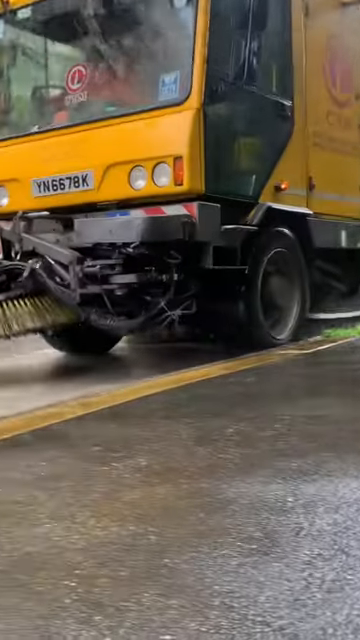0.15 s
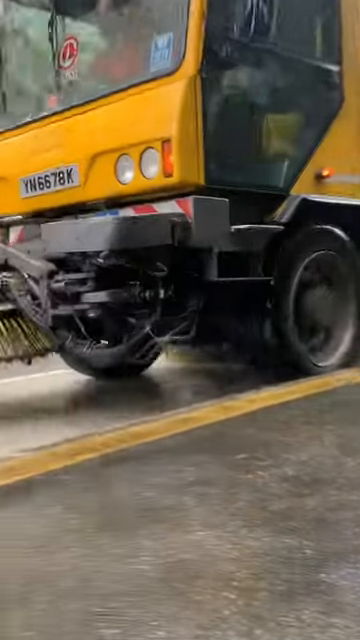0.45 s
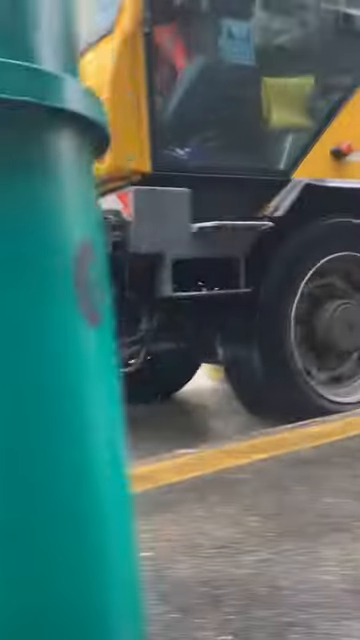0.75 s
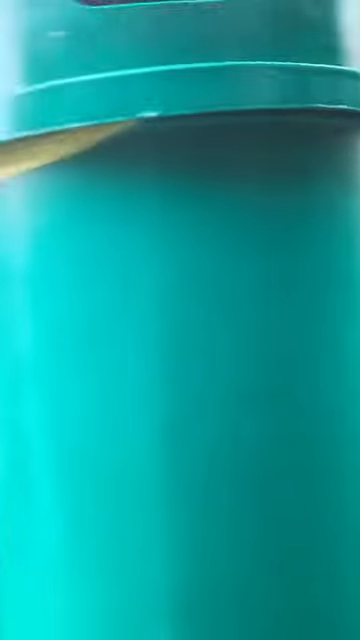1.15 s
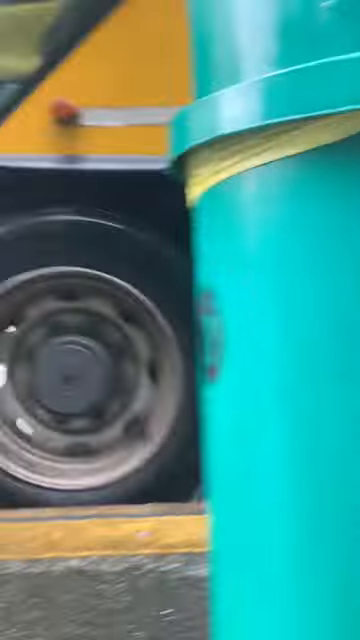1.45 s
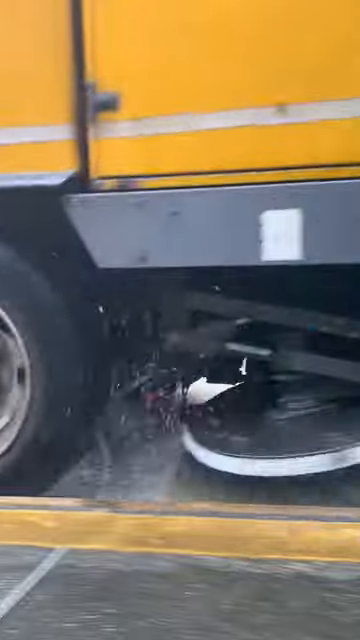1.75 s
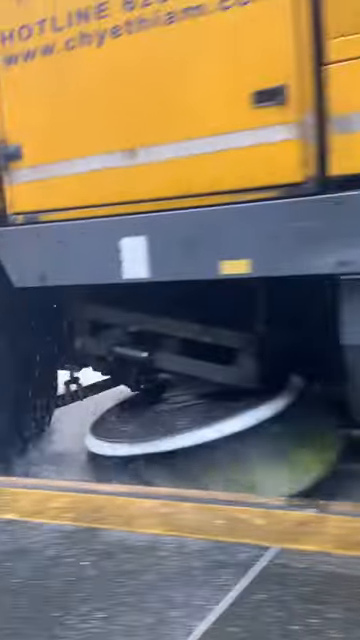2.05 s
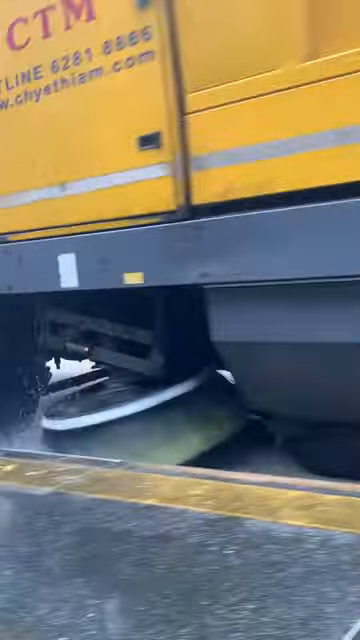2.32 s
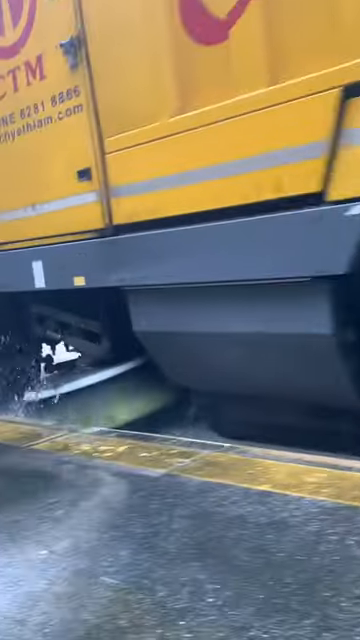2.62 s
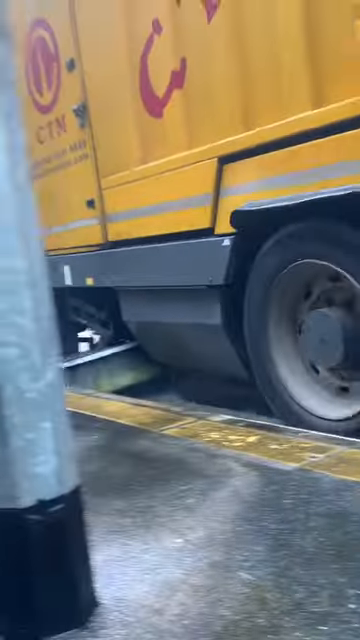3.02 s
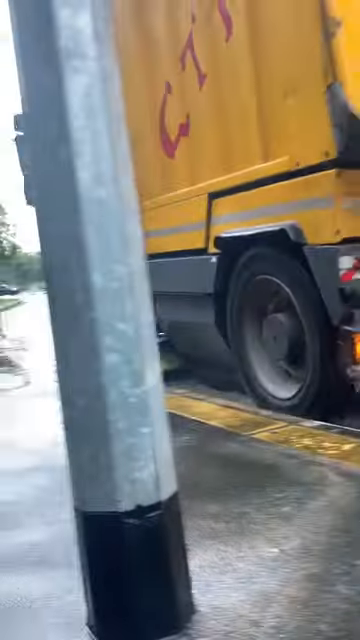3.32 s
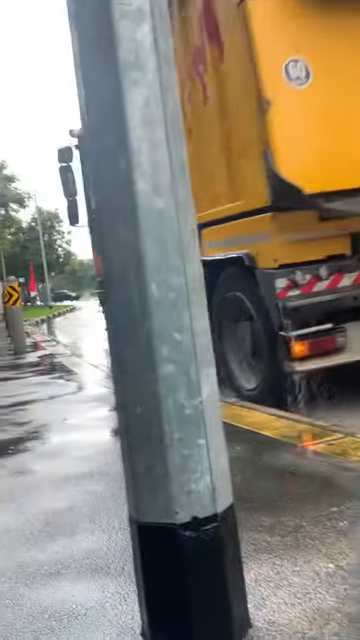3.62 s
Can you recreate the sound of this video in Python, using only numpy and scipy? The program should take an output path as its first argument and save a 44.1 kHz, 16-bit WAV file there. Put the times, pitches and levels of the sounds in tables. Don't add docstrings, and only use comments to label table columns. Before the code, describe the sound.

Close outdoor stereo pickup of a street sweeper: loud hiss of brushes and water jets over rushing suction and a constant engine drone; the hiss dips midway, returns, then dulls as the truck draws away.

```python
import sys
import numpy as np
from scipy import signal
from scipy.fft import rfft, irfft
from scipy.io import wavfile

SR = 44100
rng = np.random.default_rng(int(sys.argv[2]) if len(sys.argv) > 2 else 0)


def voltage_ratio(level):
    return 10 ** (np.asarray(level, float) / 20)


def bounce(signal):
    frames = np.transpose(np.atleast_2d(signal))
    limited = np.clip(frames, -1, 1)
    pcm = np.round(limited * 32767).astype(np.int16)
    wavfile.write(sys.argv[1], SR, pcm)


N = 166698
FIRING_HZ, PUMP_HZ = 94.95, 296.2

# (time [s], level [dB], overtones re level [dB])
EXHAUST_NOTE = [(0, -33.5, 6), (.45, -34.5, 3), (.72, -37, 1), (1.28, -32, -4), (1.6, -34, 0),
                (1.95, -32, -6), (2.65, -33, -1), (3.4, -37.5, -2), (3.78, -35.5, -3)]
# (multiple of the firing rate [1], level [dB])
EXHAUST_PARTIALS = [(.5, -47), (.667, -28), (1, 0), (1.333, -14), (1.667, -10.5), (2, -7.5), (2.333, -13.5),
                    (3.333, -17.5), (4, -12.5), (6, -18.5), (8, -27.5), (12, -31)]
CYLINDER_LEVELS = [2, -0.8, -2, 1, -1.5, -4.5]
# (time [s], engine body [dB], brushes [dB], water jets [dB])
PASSING_LEVELS = [(0, -29.5, -22.0, -28.5), (0.25, -32, -21.0, -27.5), (0.5, -30.5, -20, -29.0),
                  (0.65, -31.5, -23.5, -31.0), (0.85, -30, -24.5, -33), (1.1, -32, -22.5, -30.5),
                  (1.28, -33.5, -25, -34), (1.4, -30, -32, -35.0), (1.52, -30.5, -25.5, -30),
                  (1.63, -31.5, -21.0, -28.0), (1.9, -32.5, -22.5, -30), (2.15, -31.0, -26.0, -31),
                  (2.45, -34.5, -25, -32.5), (2.7, -34, -28, -31.5), (2.95, -33, -28, -35),
                  (3.2, -33.5, -30.5, -37), (3.45, -35.5, -32.0, -37.5), (3.78, -34, -37, -39.5)]
# (time [s], level [dB])
PANEL_LEVEL = [(0, -33), (.25, -32), (.47, -31), (.79, -37), (1.15, -37), (1.5, -36.5), (1.65, -31.5),
               (2.0, -34.5), (2.3, -35.5), (2.6, -40), (2.9, -40), (3.2, -42.5), (3.5, -41), (3.78, -44)]
# (frequency [Hz], density [dB per Hz])
BODY_SPECTRUM = [(50, -14), (66, -4), (80, -4), (200, -4.5), (300, -7), (500, -26)]
# (frequency [Hz], density [dB per Hz])
PANEL_SPECTRUM = [(180, -23), (330, 1.5), (450, 0), (700, -3), (1100, -10.5), (2500, -28)]
# (time [s], suction mouth [dB], rear outlet [dB])
AIR_LEVELS = [(0, -29.5, -33), (0.25, -28.5, -33), (0.5, -29.0, -35.5), (0.65, -30.5, -40),
              (0.85, -29, -37.5), (1.1, -30, -37), (1.28, -31.5, -38.5), (1.4, -35.5, -41.0),
              (1.52, -31.5, -37.5), (1.63, -31.0, -37.5), (1.9, -29.5, -39.5), (2.15, -31.0, -41),
              (2.45, -32, -36.5), (2.7, -33, -35), (2.95, -35.0, -36.5), (3.2, -36, -42.5),
              (3.45, -35, -40.5), (3.78, -37.5, -44.5)]
# (frequency [Hz], density [dB per Hz])
MOUTH_SPECTRUM = [(500, -12.5), (900, -6), (1300, -1.5), (1750, 0.5), (2300, -2), (3000, -6.5),
                  (4000, -8.5), (5000, -72)]
# (frequency [Hz], density [dB per Hz])
OUTLET_SPECTRUM = [(3000, -9), (3500, -7.5), (3950, 3), (4350, 1.5), (4700, -28)]
# (frequency [Hz], bandwidth [Hz], level re suction [dB])
DUCT_WHISTLES = [(762, 30, -24), (1148, 32, -18), (1407, 52, -20), (1725, 66, -21.5), (3150, 33, -25),
                 (3758, 21, -17.5), (3990, 19, -16.5)]
# (frequency [Hz], density [dB per Hz])
BRUSH_SPECTRUM = [(6000, -22), (8000, -7.5), (9500, -1.5), (11200, 1.5), (13000, -2.6), (14500, -2),
                  (16000, -8.5)]
# (frequency [Hz], density [dB per Hz])
JET_SPECTRUM = [(2400, -5.5), (3000, -2.5), (4700, -3.5), (5900, 0), (7500, -1.5), (9000, -2.5),
                (12000, -7)]
# (time [s], level [dB])
PUMP_LEVEL = [(0, -42), (.5, -42), (.8, -52), (1.3, -48), (1.65, -47), (1.92, -40.5), (2.15, -45),
              (2.45, -58), (3.78, -58)]
# (time [s], level [dB])
ROAD_LEVEL = [(0, -45), (.5, -45), (1.1, -50), (1.2, -52), (1.4, -42), (1.8, -46), (2.4, -50), (3.0, -53),
              (3.78, -52.5)]
# (frequency [Hz], density [dB per Hz])
RUMBLE_SPECTRUM = [(28, -30), (42, -3), (50, 2), (66, -10)]
# (time [s], bearing [0 cab ahead, 1 oblique, 2 broadside])
TRUCK_BEARING = [
    (0, 0),
    (.62, 0),
    (.67, 1),
    (1.15, 1),
    (1.5, 2),
    (2.55, 2),
    (3.0, 1),
    (3.78, 1),
]
# (frequency [Hz], cab ahead [0-1], oblique [0-1], broadside [0-1])
PORT_LIKENESS = [(150, .994, .994, .994), (400, .96, .98, .98), (1000, .84, .72, .77),
                 (1400, .86, .74, .82), (1900, .95, .91, .94), (2400, .55, .5, .45), (3200, .3, .35, .38),
                 (4200, .2, .35, .4), (4500, .2, .35, .3), (4850, .76, .72, .78), (5300, .8, .82, .86),
                 (6500, .78, .79, .79), (8500, .96, .965, .965), (10500, .88, .9, .9),
                 (12500, .965, .97, .97), (13500, .94, .96, .96), (14300, .85, .87, .87),
                 (15500, .95, .95, .95)]
# (frequency [Hz], cab ahead [half turns], oblique [half turns], broadside [half turns])
PORT_LAG = [(100, 0, 0, 0), (700, .1, .07, .07), (1000, .06, .11, .11), (1400, -.04, -.08, -.07),
            (1900, 0, .03, 0), (2400, .03, .2, .25), (2800, .47, .58, .88), (3200, .5, .7, .9),
            (3600, .55, .45, 1), (4000, .12, .25, 1.15), (4400, .55, .65, 1.3), (4800, .92, .94, .98),
            (5300, 1.05, 1.06, 1.04), (5950, 1.37, 1.34, 1.34), (6650, 1.62, 1.65, 1.64),
            (7300, 1.79, 1.82, 1.81), (8200, 1.98, 1.98, 1.98), (9200, 2.22, 2.12, 2.12),
            (10000, 2.4, 2.39, 2.39), (11000, 2.7, 2.74, 2.75), (11700, 2.88, 2.9, 2.9),
            (12400, 3, 2.98, 2.98), (13300, 3.17, 3.07, 3.07), (14100, 3.42, 3.39, 3.39),
            (14900, 3.76, 3.82, 3.82), (15500, 3.97, 3.98, 3.98)]
# (time [s], length [s], frequency [Hz], width [octaves], likeness lost [0-1])
POST_SCATTER = [
    (1.05, .32, 5200, .35, .6),
    (1.27, .025, 12800, .2, .5),
    (1.365, .025, 11000, 1.2, .5),
    (3.45, .2, 5300, .2, .3),
]


def rms_one(x):
    return x / np.sqrt(np.mean(x ** 2) + 1e-20)


def in_time(rows):
    s, *columns = np.transpose(rows)
    return [np.interp(np.arange(N) / SR, s, column) for column in columns]


def at_hz(points, hz):
    at, db = np.transpose(points)
    return np.interp(np.log(hz + 1e-9), np.log(at), db)


def drift(rate):
    r = np.exp(-80 * np.pi * rate / SR)
    slow = signal.lfilter([1], [1, -2 * r, r * r], rng.standard_normal(N // 40 + 2002))
    slow = slow[2000:]
    return np.interp(np.arange(N) / 40, np.arange(len(slow)), rms_one(slow))


def turbulence(spectrum, patchy_db, flicker_per_s, grains=None):
    low_hz, high_hz = spectrum[0][0], spectrum[-1][0]
    bands_per_octave, shared = 2.5, 0.5
    hz = np.arange(N // 2 + 1) * SR / N
    source = rng.standard_normal((2, N))
    if grains is not None:
        source = source + grains
    pair = rfft(source) * voltage_ratio(at_hz(spectrum, hz)) * (hz > low_hz) * (hz < high_hz)
    place = bands_per_octave * np.log2(hz / low_hz + 1e-9)
    together = drift(8.0)
    out = 0
    for k in range(int(bands_per_octave * np.log2(high_hz / low_hz)) + 2):
        band = irfft(pair * np.clip(1 - np.abs(place - k), 0, 1), N)
        out = out + band * voltage_ratio(patchy_db * (shared * together + drift(flicker_per_s)))
    return rms_one(out)


def engine(body_db, panel_db):
    note_db, over_db = in_time(EXHAUST_NOTE)
    turns = FIRING_HZ * np.arange(N) / SR
    note = 0
    for multiple, db in EXHAUST_PARTIALS:
        jitter = 0.21 * np.sqrt(multiple) * drift(3.5)
        phase = 2 * np.pi * (multiple * turns + rng.random()) + jitter
        level = db + over_db * (multiple > 1.5) + 0.5 * drift(6.6)
        note = note + np.sqrt(2) * voltage_ratio(level) * np.sin(phase)
    firing_db = np.interp(turns % 6, np.arange(7), np.r_[CYLINDER_LEVELS, CYLINDER_LEVELS[0]])
    exhaust = voltage_ratio(note_db) * note * [[1], [0]] * voltage_ratio(0.51 * firing_db)
    throb = voltage_ratio(firing_db) * (1 + 0.26 * np.cos(2 * np.pi * turns))
    body = voltage_ratio(body_db - 2) * throb * turbulence(BODY_SPECTRUM, patchy_db=0.05, flicker_per_s=3.2)
    panels = voltage_ratio(panel_db - 1) * turbulence(PANEL_SPECTRUM, patchy_db=1.65, flicker_per_s=10.6)
    return panels + exhaust + body


def duct_whistles():
    whistles = 0
    for hz, width, db in DUCT_WHISTLES:
        r = np.exp(-np.pi * width / SR)
        poles = [1, -2 * r * np.cos(2 * np.pi * hz / SR), r * r]
        once = signal.lfilter([1, 0, -1], poles, rng.standard_normal((2, N)))
        whistles = whistles + voltage_ratio(db) * rms_one(signal.lfilter([1], poles, once))
    return whistles


def suction(mouth_db, outlet_db):
    mouth = turbulence(MOUTH_SPECTRUM, patchy_db=1.44, flicker_per_s=11.0) + duct_whistles()
    outlet = turbulence(OUTLET_SPECTRUM, patchy_db=-2.0, flicker_per_s=15.0)
    outlet_view_db = mouth_db + 1.87 * (outlet_db - mouth_db)
    return voltage_ratio(mouth_db + 0.68) * mouth + voltage_ratio(outlet_view_db + 4) * outlet


def brushes(view_db):
    bristles_per_s, bristle_share = 9000, 0.22
    flicks = (rng.random((2, N)) < bristles_per_s / SR) * rng.standard_normal((2, N))
    grains = bristle_share * rms_one(flicks)
    return voltage_ratio(view_db - 0.04) * turbulence(BRUSH_SPECTRUM, patchy_db=1.0, flicker_per_s=20.0, grains=grains)


def water_jets(jets_db):
    return voltage_ratio(jets_db + 3.5) * turbulence(JET_SPECTRUM, patchy_db=-0.5, flicker_per_s=17.0)


def pump():
    db, = in_time(PUMP_LEVEL)
    level = voltage_ratio(db + 2.1 * drift(4.3))
    phase = 2 * np.pi * PUMP_HZ * np.arange(N) / SR + 0.5 * drift(1.5)
    return np.sqrt(2) * np.array([[1], [0]]) * level * np.sin(phase)


def road():
    db, = in_time(ROAD_LEVEL)
    return voltage_ratio(db + 0.6) * turbulence(RUMBLE_SPECTRUM, patchy_db=1.5, flicker_per_s=3.0)


def scene():
    body_db, view_db, jets_db = in_time(PASSING_LEVELS)
    truck = engine(body_db, *in_time(PANEL_LEVEL)) + suction(*in_time(AIR_LEVELS))
    return truck + brushes(view_db) + water_jets(jets_db) + pump() + road()


def by_bearing(table, hz, bearing):
    at, *columns = np.transpose(table)
    blend = 0
    for k, column in enumerate(columns):
        blend = blend + np.interp(hz, at, column)[:, None] * np.clip(1 - np.abs(bearing - k), 0, 1)
    return blend


def roll_off(x):
    return signal.sosfilt(signal.butter(12, 17070, fs=SR, output="sos"), x)


def record(dry):
    hz, s, (left, right) = signal.stft(dry, SR, nperseg=1024)
    bearing = np.clip(np.interp(s, *np.transpose(TRUCK_BEARING)), 0, 2)
    alike = np.clip(by_bearing(PORT_LIKENESS, hz, bearing), 0, 1)
    for at, length, centre_hz, octaves, lost in POST_SCATTER:
        off_hz = (2 * np.log2(hz / centre_hz + 1e-9) / octaves)[:, None]
        off_time = 2 * (s - at) / length
        edge = np.exp(-off_hz ** 4 - off_time ** 4)
        alike = alike * (1 - np.clip(lost, 0, 1) * edge)
    direct = np.sqrt((1 + alike) / 2) * left
    diffuse = np.sqrt((1 - alike) / 2) * right
    bass = voltage_ratio(2 * np.exp(-(np.log2(hz / 178 + 1e-9) / 1.55) ** 2))[:, None]
    lag = np.exp(-1j * np.pi * by_bearing(PORT_LAG, hz, bearing))
    pair = np.array([direct + diffuse, (direct - diffuse) * bass * lag])
    below_cutoff = (hz < 15850)[:, None]
    ports = signal.istft(pair * below_cutoff, SR, nperseg=1024)[1][:, :N]
    return roll_off(ports)


dry = scene()
out = record(dry)
bounce(out)
```